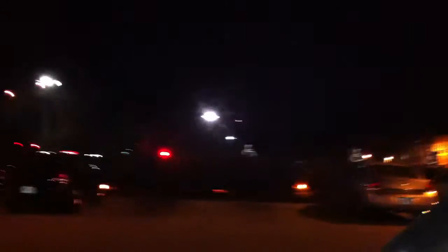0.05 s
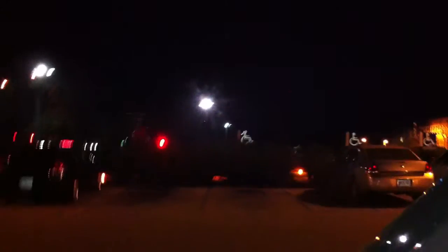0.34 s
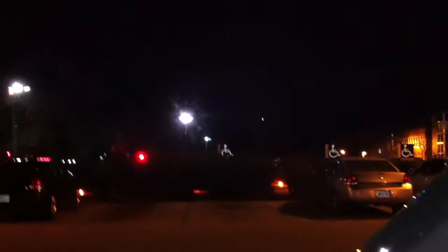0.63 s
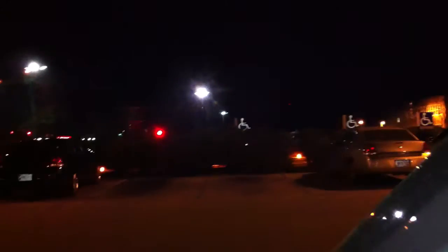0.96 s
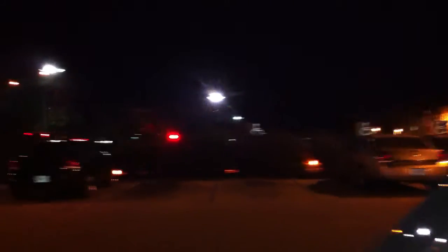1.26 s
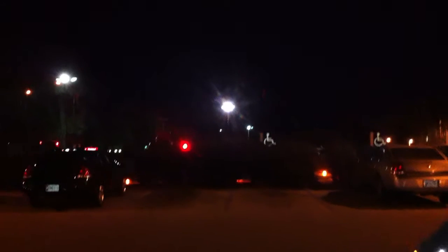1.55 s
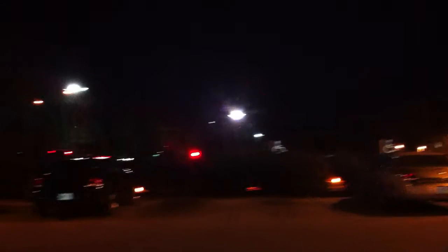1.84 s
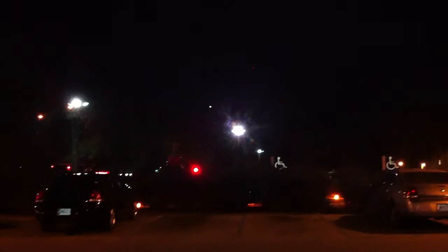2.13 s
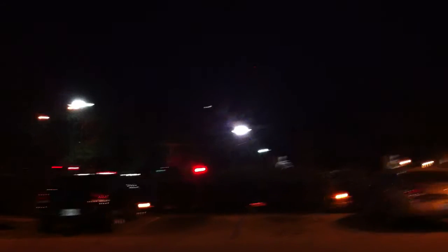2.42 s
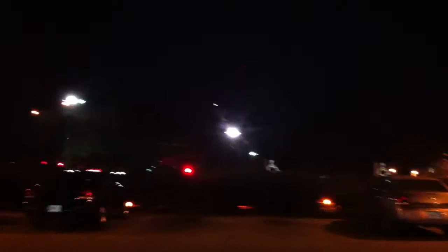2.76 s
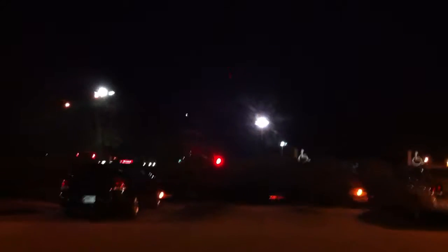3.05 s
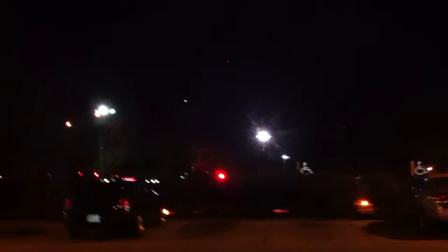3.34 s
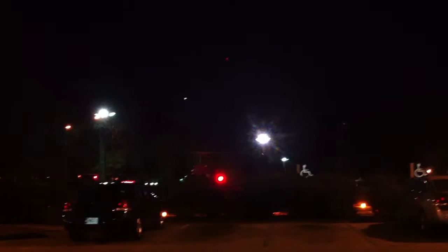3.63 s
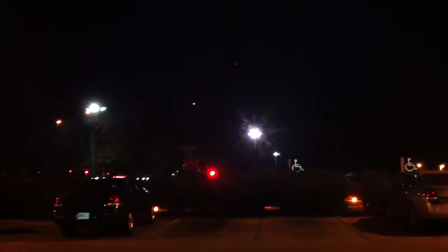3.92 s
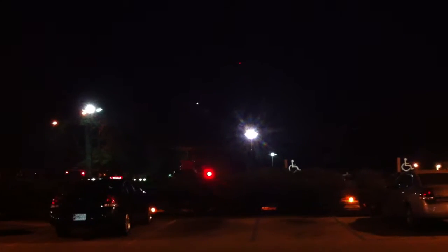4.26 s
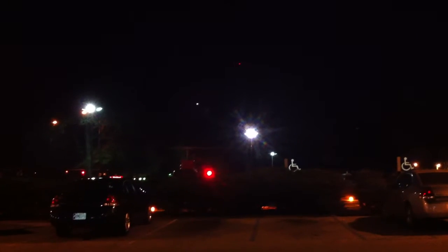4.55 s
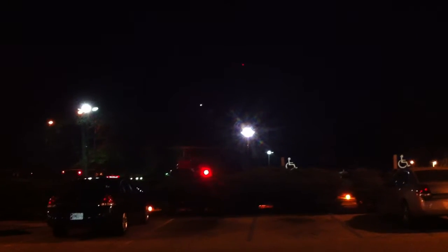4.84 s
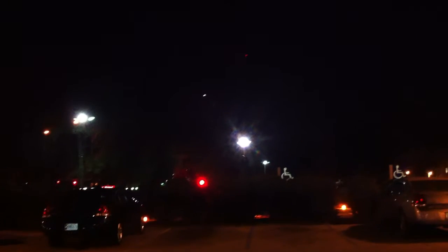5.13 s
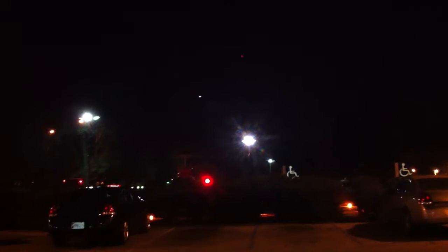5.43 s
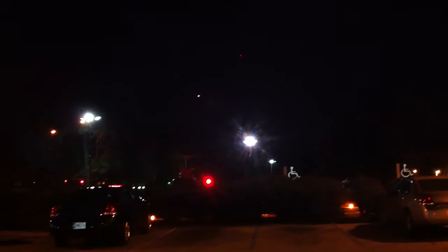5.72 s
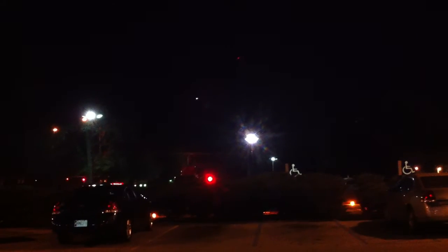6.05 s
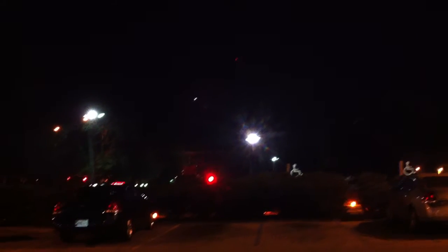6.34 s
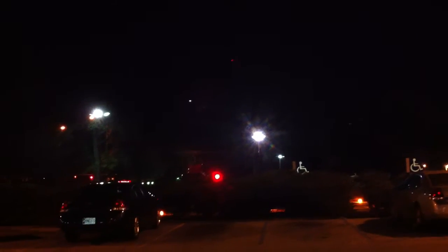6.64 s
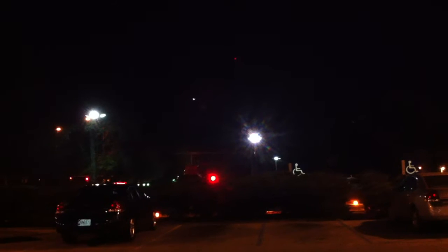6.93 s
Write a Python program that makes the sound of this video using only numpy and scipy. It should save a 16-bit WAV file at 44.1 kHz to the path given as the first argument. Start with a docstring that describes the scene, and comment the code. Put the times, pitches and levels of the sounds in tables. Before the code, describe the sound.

Outdoors in a parking lot, a helicopter engine runs up with a continuous bright hiss, rushing exhaust and a piercing whine that keeps rising. Distant thumps like car doors come near the start. As the power builds, the hiss softens, a brief gear squeal passes, and a howl emerges with a faint drone and the first pulses of the blades.

```python
"""A turbine helicopter spools up beside a parking lot at night.
From the start the compressor whine climbs over bright intake hiss, jet rush and a low combustor roar,
while the power turbine sings more faintly. Around one second in, dull thumps sound far off, like car
doors. Near four seconds the power comes up, the hiss eases and a gear squeals once. Toward the end the
compressor shaft swells into a howl, the tail rotor drones and the main rotor begins to beat."""
import sys
import numpy as np
from scipy import signal
from scipy.fft import rfft, irfft
from scipy.io import wavfile
from scipy.ndimage import uniform_filter1d

SR = 44100
rng = np.random.default_rng(int(sys.argv[2]) if len(sys.argv) > 2 else 0)


def unload_wav(signal):
    """Save mono or channel-first audio to the path in sys.argv[1] as 16-bit WAV at rate SR, clipped to [-1, 1]."""
    wavfile.write(
        sys.argv[1],
        SR,
        np.round(np.clip(np.atleast_2d(signal).T, -1, 1) * 32767).astype(np.int16),
    )


N = 312228
TIME = np.arange(N) / SR
COMPRESSOR_BLADES, FADE_RATE_HZ = 18, 22

# compressor blade-passing tone: time_s, pitch_hz
WHINE_PITCH = [(0, 9750), (.33, 9912), (1.24, 10497), (1.6, 10645), (2.09, 10780), (2.17, 10845),
               (2.28, 10840), (2.46, 10899), (4, 11504), (4.85, 11854), (5.4, 12100), (5.75, 12200),
               (6.15, 12274), (7.08, 12335)]
# engine power: time_s, share (0-1)
ENGINE_POWER = [(0, 0), (3.2, 0.14), (3.8, 0.7), (4.6, 0.86), (5.5, 0.91), (7.08, 0.92)]
# power turbine shaft: time_s, pitch_hz, level_db
TURBINE_SHAFT = [(0, 1045, -58), (.9, 1056, -49), (1.4, 1070, -49), (2, 1092, -45.5), (2.7, 1120, -47.5),
                 (3.35, 1149, -45), (3.7, 1168, -53), (4.4, 1215, -48), (5.5, 1285, -58), (7.08, 1350, -70)]


def compressor(waver_hz=6, skirt_db=-23, sides_db=-23, halo_share=.5):
    """The blade-passing whine with its turbulent skirt, and weaker multiples of the shaft rate."""
    # how strongly the whine beams this way: time_s, level_db
    beam = [(0.0, -42), (0.12, -38), (0.24, -29), (0.3, -45), (0.42, -23), (0.52, -34), (0.54, -21.5),
            (0.7, -19.5), (0.83, -32), (0.88, -16), (0.96, -13.5), (1.02, -20.5), (1.1, -24), (1.15, -16),
            (1.2, -25), (1.55, -29.5), (1.7, -27), (1.82, -23.5), (1.92, -23), (2.05, -22.5), (2.16, -28.5),
            (2.28, -23.5), (2.34, -34), (2.4, -22.5), (2.44, -27.5), (2.54, -25.5), (2.58, -35),
            (2.66, -23.0), (2.72, -39), (2.9, -33), (2.96, -38), (3.03, -26), (3.11, -43), (3.18, -26),
            (3.24, -37), (3.38, -26), (3.5, -29), (3.58, -37), (3.76, -40), (4.02, -31.5), (4.12, -43),
            (4.38, -35.5), (4.56, -42), (4.9, -30.5), (4.98, -44), (5.12, -32.5), (5.36, -32), (5.44, -22),
            (5.58, -31.5), (5.78, -35), (5.84, -28.5), (6.34, -39), (6.46, -26), (6.54, -22.5), (6.62, -32),
            (6.7, -20.5), (6.86, -15.5), (6.92, -20.5), (7.08, -21.5)]
    # weaker shaft tones: shaft_multiple, low_power_db, full_power_db
    orders = [(16, -58, -53), (17, -42, -62), (20, -68, -47)]
    hz, power, beam_db = follow(WHINE_PITCH)[0], follow(ENGINE_POWER)[0], follow(beam)[0]
    core = tone(hz + waver_hz * (1 - power) * drift(FADE_RATE_HZ), scatter=.17, flutter_hz=40)
    skirt = unit(drift(90) + .27 * drift(450)) * tone(hz, scatter=.58, flutter_hz=60)
    # at low power the turbine shaft shakes the whine and adds rough side tones
    sides = core * tone(follow(TURBINE_SHAFT)[0] / 3, scatter=2, flutter_hz=25)
    halo = amp(skirt_db) * skirt + amp(sides_db) * (1 - power) ** 2 * sides
    shaft = np.zeros(N)
    for multiple, low_db, full_db in orders:
        partial = tone(hz * multiple / COMPRESSOR_BLADES, scatter=1.2, flutter_hz=25)
        shaft += amp(low_db + (full_db - low_db) * power) * partial
    # moving air fades the whine in and out, most when it beams away
    fade_db = 2.2 * np.interp(beam_db, [-26, -14], [1, .45]) * drift(FADE_RATE_HZ)
    return amp(beam_db + fade_db) * core + amp(halo_share * beam_db) * halo + shaft


def intake(patchy_db=1.0, flicker_db=.62, size=1024):
    """Air tearing into the engine: hiss that changes colour with power and shimmers in the wind."""
    # hiss envelope: time_s, level_db
    envelope = [(0.0, -20.5), (0.52, -20), (0.72, -19.5), (0.76, -18), (1.26, -21), (1.3, -21),
                (1.74, -22.0), (1.82, -23), (2.06, -21), (2.16, -21), (2.26, -19), (2.3, -21.5), (2.8, -20),
                (3.2, -23), (3.34, -18.5), (3.52, -26.5), (3.62, -27.0), (3.76, -29.5), (4.04, -27.5),
                (4.32, -27.5), (4.36, -26.5), (4.56, -26), (4.62, -28.5), (4.88, -28.5), (5.14, -28.0),
                (5.26, -30), (5.42, -26), (5.5, -28), (5.84, -30), (6.0, -29), (6.06, -31), (6.2, -27.5),
                (6.4, -28), (6.54, -25.5), (6.68, -26.5), (6.72, -23.5), (6.88, -25.5), (7.08, -25.5)]
    # hiss colour: frequency_hz, low_power_db, full_power_db
    spectrum = [(60, -33, -46), (400, -35, -46), (1490, -40, -38), (2770, -22, -18), (3170, -14.5, -11.5),
                (3760, -8.5, -10.5), (4140, -6, -4.5), (4370, -2.5, -4), (5000, -6, -7), (5660, -1, 0.5),
                (6740, -1.5, 1.5), (7260, -.5, 0.5), (8050, -5.5, -3), (8800, -9, -4), (9500, -4, -1),
                (10300, -2, -1.5), (11100, -1.5, -8.5), (11260, -12, -21), (12180, -9, 1),
                (13200, -4, -9.5), (14260, -13, -6), (14800, -26, -39)]
    # fizz above 7 kHz: time_s, gain_db
    fizz = [(0, -6.5), (.9, -3.5), (2, -7), (3.05, -0.5), (3.4, -6), (4.15, -2.5), (4.7, -2.5), (6.3, 0),
            (6.8, 6), (7.08, 1)]
    # the hiss crowds into a narrow wandering band: time_s, centre_hz, gain_db, width_hz
    peak = [(0, 5750, -5.5, 800), (.9, 6080, 7.5, 650), (1.25, 5950, 4.5, 600), (1.6, 5660, 4, 550),
            (2.1, 5600, 7.5, 480), (2.75, 5800, 5.5, 480), (3.3, 5830, 6, 650), (4, 5570, 0.5, 800),
            (6, 6040, -1, 800), (7.08, 6180, 4.5, 700)]
    # a lower shoulder climbs: time_s, centre_hz, gain_db, width_hz
    shoulder = [(0, 3720, 2.5, 220), (.7, 3800, 2.5, 220), (1.3, 4550, -1.5, 280), (1.9, 4550, 5.5, 260),
                (2.6, 4550, 1.5, 260), (4.4, 4600, 3.5, 260)]
    # two paths cancel in a shifting band: time_s, centre_hz, gain_db, width_hz
    notch = [(0, 9300, 0, 300), (.4, 9200, 0, 300), (.7, 8500, -3, 300), (1.3, 8850, -5, 350),
             (2.1, 8750, -4, 350), (2.5, 8450, -10, 280), (3.15, 8450, -10, 280), (3.7, 8800, -9, 240),
             (4.7, 8700, -10, 260), (6, 8500, -11, 300), (7.08, 8480, -13, 260)]
    # a narrow hollow slides down: time_s, centre_hz, gain_db, width_hz
    hollow = [(0, 5350, -8, 220), (1.1, 5250, -6, 200), (1.9, 5130, -4, 180), (2.8, 5120, -6.5, 190),
              (3.8, 5050, -1, 160), (4.5, 5020, 0, 180), (5.6, 5030, -3, 240), (7.08, 5040, -8, 240)]
    hz, t, bins = signal.stft(rng.standard_normal(N), SR, nperseg=size, noverlap=size * 3 // 4)
    low_db, full_db = (column[:, None] for column in colour(spectrum, hz))
    sweeps_db = sum(bell(band, hz, t) for band in (peak, shoulder, notch, hollow))
    shape = amp(low_db + (full_db - low_db) * follow(ENGINE_POWER, t)[0] + sweeps_db)
    body = (hz > 3500) & (hz < 8000)
    shape /= np.sqrt((shape[body] ** 2).sum(0) / len(hz))  # the body holds its level as the colour moves
    gusts_db = patchy_db * patches(bins.shape, bands=18, frames=12)
    treble_db = np.clip((hz[:, None] - 7000) / 3000, 0, 1) * follow(fizz, t)[0]
    bins = bins * shape * amp(follow(envelope, t)[0] + treble_db + gusts_db)
    hiss = signal.istft(bins, nperseg=size, noverlap=size * 3 // 4)[1][:N]
    return rippled(hiss, depth_db=1.9) * amp(flicker_db * drift(19))


def combustor_roar():
    """Low combustor noise that throbs unevenly and rings in a few hollow resonances."""
    # roar colour: frequency_hz, level_db
    spectrum = [(20, -48), (40, -49), (65, -37), (90, -26), (115, -17), (170, -9.5), (205, -4), (250, -0.5),
                (290, -3.5), (340, -5), (380, -12.5), (520, -13.5), (700, -23.5), (1500, -44)]
    # hollow resonances: centre_hz, width_hz, gain_db
    modes = [(126.7, 3.8, 2), (155, 4.4, 5.5), (197.8, 2.7, 8), (213, 6, -0.5), (232, 16, 1.5),
             (314.8, 4.3, 5), (415.7, 13, 7), (501, 9.6, 4.5)]
    # uneven throb: time_s, level_db
    throb = [(0, -36), (.15, -35), (.26, -30.5), (.42, -35.5), (.58, -28.5), (.68, -33.5), (.78, -27.5),
             (.86, -34.5), (1.12, -31.5), (1.3, -35), (1.44, -34.5), (1.55, -29), (1.65, -34.5),
             (1.75, -30), (1.82, -33.5), (1.9, -30), (2.05, -35), (2.26, -31), (2.46, -33), (2.62, -31),
             (2.88, -32), (3.42, -31), (3.58, -32), (3.68, -28.5), (3.97, -33), (4.28, -29.5), (4.36, -32),
             (4.6, -30.5), (4.85, -31.5), (5, -28.5), (5.15, -31), (5.45, -29.5), (5.56, -33.5),
             (5.71, -27), (5.84, -32), (6.07, -28.5), (6.17, -31.5), (6.29, -27), (6.48, -32),
             (6.68, -28.5), (7.08, -31)]
    hz = np.fft.rfftfreq(N, 1 / SR)
    ring_db = sum(db * np.exp(-((hz - centre) / width) ** 2) for centre, width, db in modes)
    roar = unit(irfft(rfft(noise(spectrum)) * amp(ring_db), N))
    return amp(follow(throb)[0]) * steady(roar)


def jet_rush():
    """The exhaust jet: midrange noise that crossfades between two colours as the power rises."""
    # rush colour: frequency_hz, low_power_db, full_power_db
    spectrum = [(250, -50, -26), (506, -3, -0.5), (660, 0.5, -3), (830, 0.5, -1.5), (1100, 2.5, 0.5),
                (1375, 3.5, 1), (1770, -2.5, -5), (1794, 5, 0.5), (2240, 1.5, -9), (2800, -16.5, -13.5),
                (4000, -27, -15.5)]
    # rush envelope: time_s, level_db
    envelope = [(0, -31.5), (1, -32), (1.7, -34.5), (2.4, -34), (3.3, -33), (4.2, -35), (5.2, -32.5),
                (7.08, -32.5)]
    power = follow(ENGINE_POWER)[0]
    rush = np.sqrt(1 - power) * noise(spectrum) + np.sqrt(power) * noise(spectrum, column=1)
    return amp(follow(envelope)[0]) * rippled(rush, depth_db=1.7)


def rotor_hz(start_hz=14, climb_hz_per_s=1.08):
    """Main rotor blades passing per second, steadily gathering speed."""
    return start_hz + climb_hz_per_s * TIME


def rotor_chop_db():
    """Two main blades of unequal strength swish past in rounded pulses that deepen with speed."""
    rate = rotor_hz()
    depth_db = 1.65 * (rate / rate[-1]) ** 4
    phase = 2 * np.pi * np.cumsum(rate) / SR
    return depth_db * (np.cos(phase / 2) + np.cos(phase) + .35 * np.cos(2 * phase))


def exhaust(roar_share=.45):
    """The main rotor chops the jet rush and, more gently, the combustor roar."""
    chop_db = rotor_chop_db()
    return amp(roar_share * chop_db) * combustor_roar() + amp(chop_db) * jet_rush()


def shaft_hum(flutter_db=1.0):
    """The compressor shaft's own rate and its fluttering octave, which swells into a howl."""
    # hum envelopes: time_s, fundamental_db, octave_db
    envelopes = [(0, -46, -58), (.3, -45, -58), (.55, -58, -58), (3.7, -62, -55), (4.5, -57, -47),
                 (5, -52, -42.5), (5.6, -49, -38.8), (6.4, -47.5, -37), (7.08, -48.5, -37.8)]
    hz = follow(WHINE_PITCH)[0] / COMPRESSOR_BLADES
    fundamental_db, octave_db = follow(envelopes)
    fundamental = amp(fundamental_db) * tone(hz, scatter=.9, flutter_hz=20)
    octave = tone(2 * hz, scatter=.55, flutter_hz=50)
    return fundamental + amp(octave_db + flutter_db * drift(FADE_RATE_HZ)) * octave


def power_turbine():
    """The second shaft sings a faint rising note that fades away."""
    hz, level_db = follow(TURBINE_SHAFT)
    return amp(level_db) * tone(hz, scatter=.31, flutter_hz=12)


def gear_squeal():
    """Meshing gears give a rough, climbing tone that swells and dies once."""
    # the squeal: peak_s, half_length_s, pitch_hz, climb_hz_per_s, level_db
    squeal = (4.07, .37, 5190, 130, -37)
    peak_s, half_length_s, hz, climb, level_db = squeal
    swell = np.exp(-((TIME - peak_s) / half_length_s) ** 2)
    return amp(level_db) * swell * tone(hz + climb * (TIME - peak_s), scatter=2.5, flutter_hz=75)


def tail_rotor(end_db=-59, octave_end_db=-49):
    """The tail blades drone on a low note and its octave, both growing louder with speed."""
    hz = 3.3 * rotor_hz()  # tail blades passing per main blade
    doublings = np.log2(hz / hz[-1])
    fundamental = amp(end_db + 60 * doublings) * tone(hz, scatter=.4, flutter_hz=6)
    octave = amp(octave_end_db + 21 * doublings) * tone(2 * hz, scatter=.76, flutter_hz=6)
    return fundamental + octave


def far_thumps(sag=.9):
    """Each thump is a short low push whose pitch sags as it dies."""
    # two dull thumps and two fainter ones: start_s, level_db, start_pitch_hz, length_s
    hits = [(0.668, -42, 98, .135), (1.047, -48, 60, .045), (1.145, -40, 100, .115), (1.335, -51, 75, .05)]
    out = np.zeros(N)
    for start_s, level_db, hz, length_s in hits:
        age = np.clip((TIME - start_s) / length_s, 0, 1)
        swell = np.sin(np.pi * age ** .7) ** 2
        cycles = hz * length_s * (1 - np.exp(-sag * age)) / sag
        out += amp(level_db) * swell * np.sin(2 * np.pi * cycles)
    return out


def tone(hz, scatter, flutter_hz):
    """A tone heard through moving air: a direct path plus scattered ones that fade in and out."""
    paths = unit(1 + scatter * (drift(flutter_hz) + 1j * drift(flutter_hz)))
    return unit((paths * np.exp(2j * np.pi * np.cumsum(hz) / SR)).real)


def rippled(x, depth_db, size=1024):
    """Reflections comb a noise into narrow ridges that last about half a second."""
    bins = signal.stft(x, nperseg=size, noverlap=size * 3 // 4)[2]
    gain = amp(depth_db * patches(bins.shape, bands=3, frames=110))
    gain /= np.sqrt(uniform_filter1d(gain ** 2, size=24, axis=0))  # ridges move energy but add none
    return signal.istft(bins * gain, nperseg=size, noverlap=size * 3 // 4)[1][:N]


def patches(shape, bands, frames):
    """Random soft patches of rms 1, so many bands wide and frames long."""
    across_bands = uniform_filter1d(rng.standard_normal(shape), size=bands, axis=0)
    return unit(uniform_filter1d(across_bands, size=frames, axis=1))


def bell(rows, hz, t):
    """A moving peak or dip in dB, bins x frames."""
    centre, db, width = follow(rows, t)
    return db * np.exp(-((hz[:, None] - centre) / width) ** 2)


def steady(x, window_s=.16):
    """Evens out the chance swells of a noise, so that its envelope can take over."""
    power = x ** 2
    for _ in range(2):
        power = uniform_filter1d(power, size=int(window_s * SR))
    return x / np.sqrt(abs(power) + 1e-12)


def noise(rows, column=0):
    """Steady noise of a given colour, rms 1."""
    gain = amp(colour(rows, np.fft.rfftfreq(N, 1 / SR))[column])
    return unit(irfft(rfft(rng.standard_normal(N)) * gain, N))


def drift(rate_hz):
    """Smooth random motion of rms 1, up to about rate_hz."""
    hz = np.arange(0, 4 * rate_hz, SR / N)
    real, imag = rng.standard_normal((2, N // 16))[:, :len(hz)]
    return unit(irfft((real + 1j * imag) * np.exp(-(hz / rate_hz) ** 2), N))


def follow(rows, t=TIME):
    """The columns of a curve table at times t."""
    times, *columns = np.transpose(rows)
    return [np.interp(t, times, column) for column in columns]


def colour(rows, hz):
    """The columns of a spectrum table at frequencies hz."""
    points_hz, *columns = np.transpose(rows)
    return [np.interp(np.log(hz + 1), np.log(points_hz), column) for column in columns]


def amp(db):
    """Decibels to gain."""
    return 10 ** (np.asarray(db) / 20)


def unit(x):
    """Scales to rms 1."""
    return x / np.sqrt(np.mean(abs(x) ** 2) + 1e-20)


def scene():
    """The helicopter's tones and rushing air with the far thumps, mixed to the centre."""
    tones = compressor() + shaft_hum() + power_turbine() + gear_squeal() + tail_rotor()
    mono = tones + intake() + exhaust() + far_thumps()
    return np.array([mono, mono])


def record(dry):
    """A steep lowpass trims the treble above 15.75 kHz."""
    lowpass = signal.firwin(511, 15750, window=("kaiser", 9), fs=SR)
    return signal.oaconvolve(dry, lowpass[None], "same", axes=1)


dry = scene()
out = record(dry)
unload_wav(out)
```